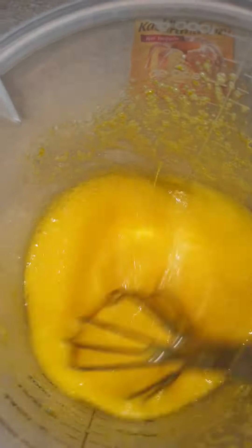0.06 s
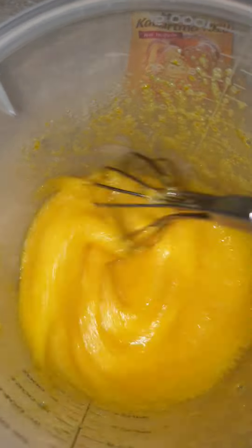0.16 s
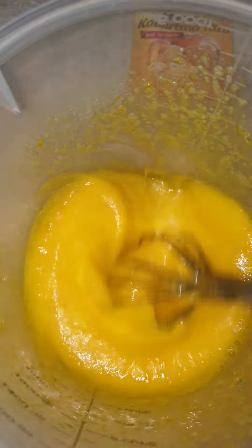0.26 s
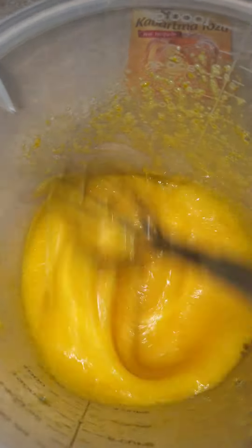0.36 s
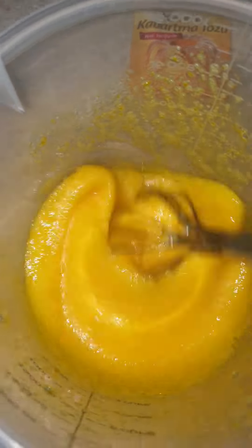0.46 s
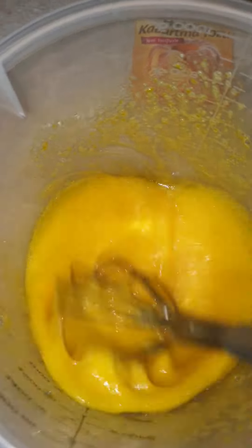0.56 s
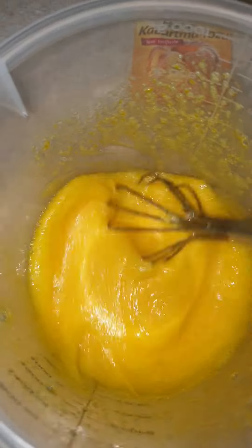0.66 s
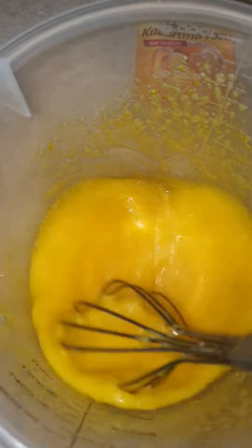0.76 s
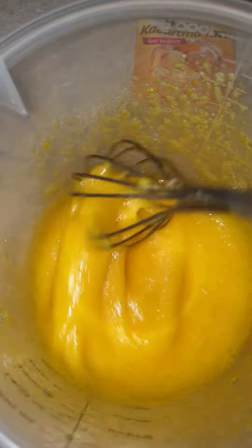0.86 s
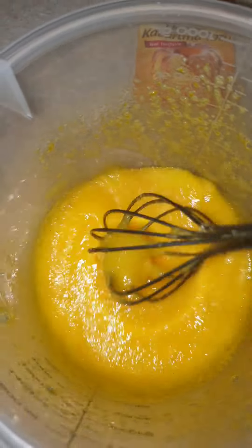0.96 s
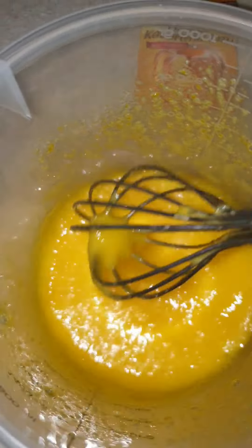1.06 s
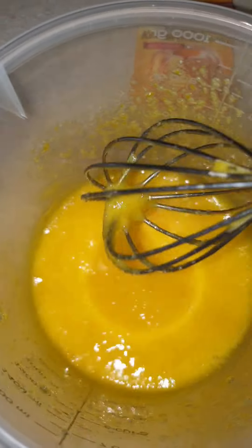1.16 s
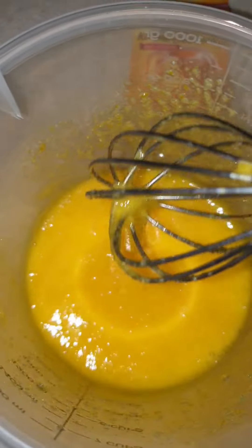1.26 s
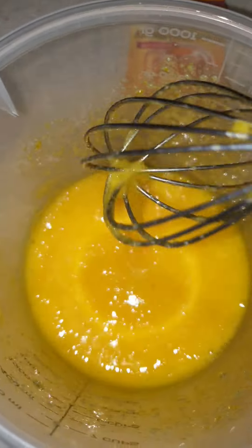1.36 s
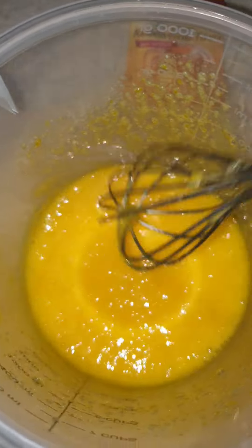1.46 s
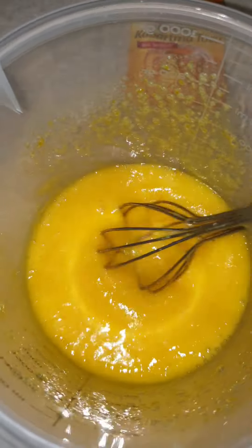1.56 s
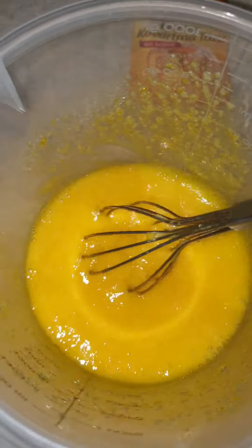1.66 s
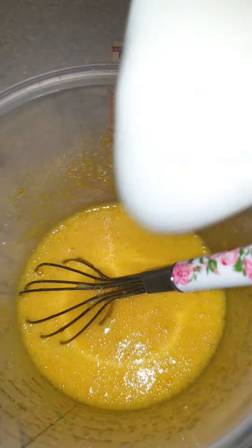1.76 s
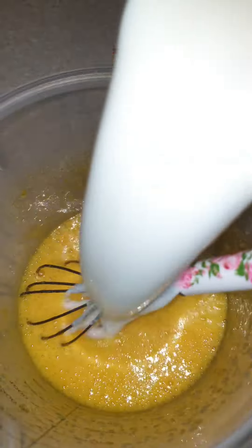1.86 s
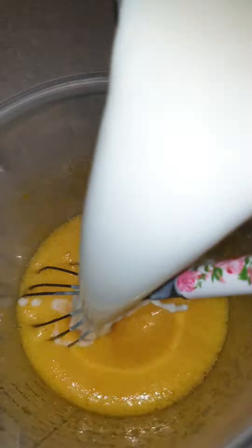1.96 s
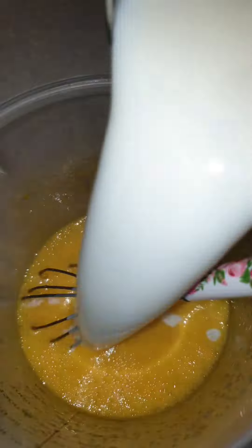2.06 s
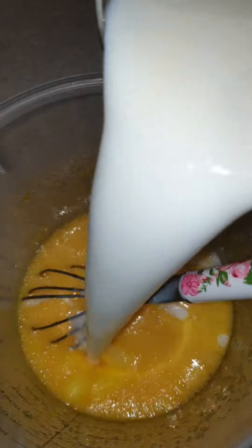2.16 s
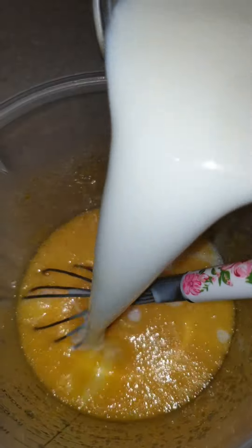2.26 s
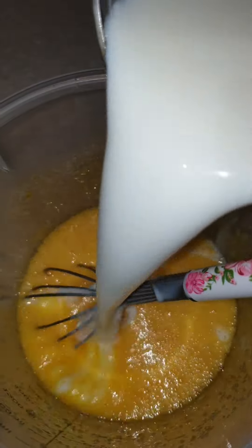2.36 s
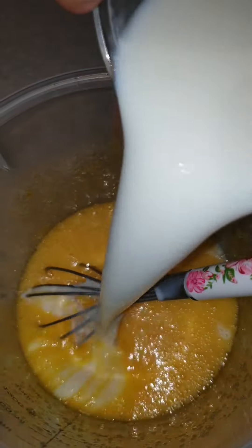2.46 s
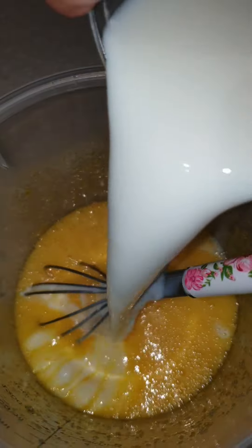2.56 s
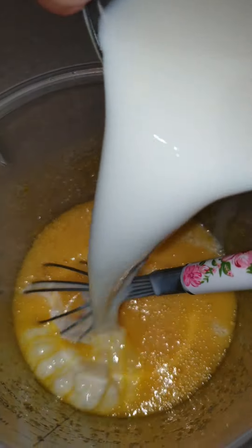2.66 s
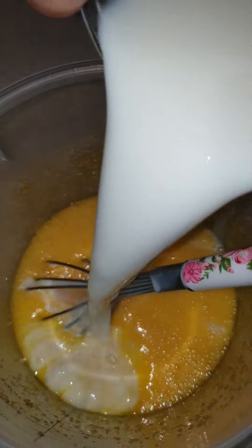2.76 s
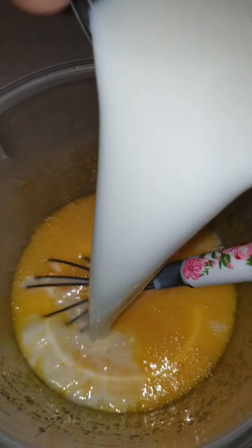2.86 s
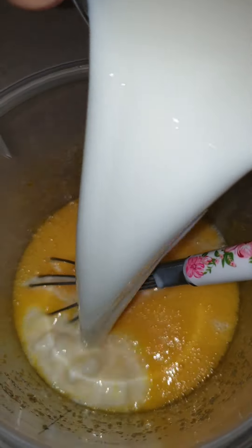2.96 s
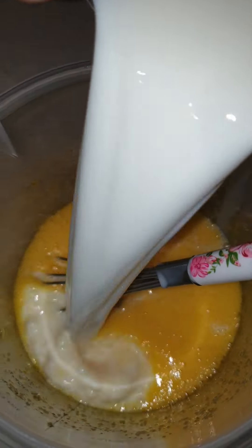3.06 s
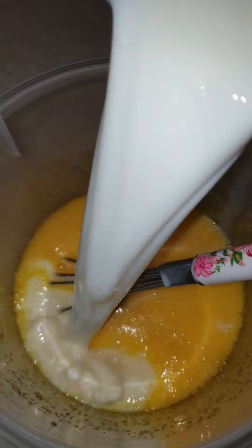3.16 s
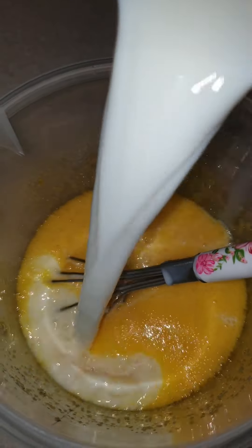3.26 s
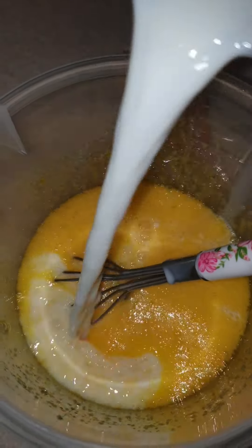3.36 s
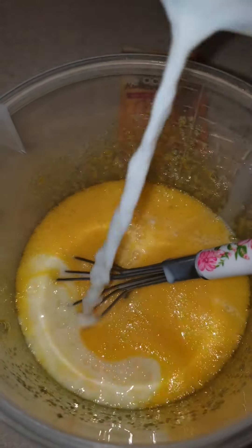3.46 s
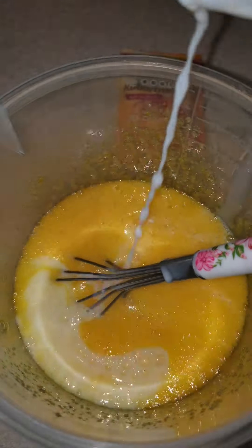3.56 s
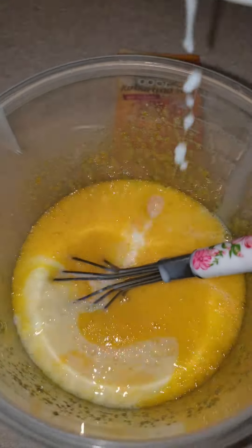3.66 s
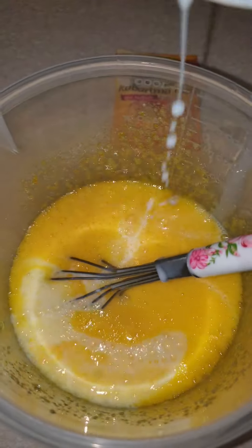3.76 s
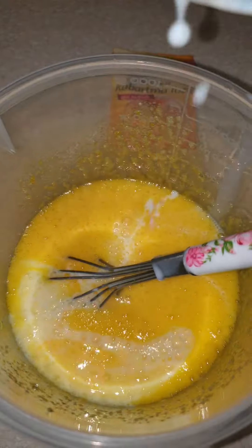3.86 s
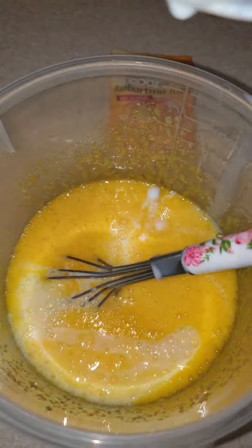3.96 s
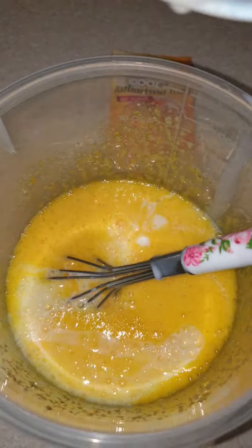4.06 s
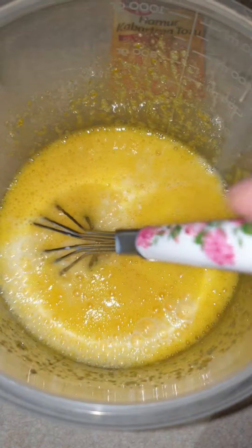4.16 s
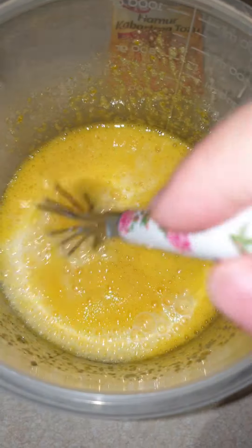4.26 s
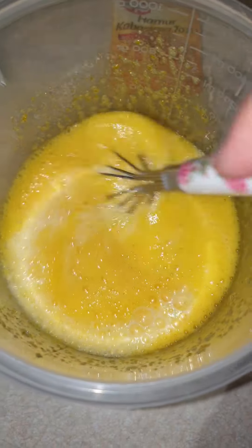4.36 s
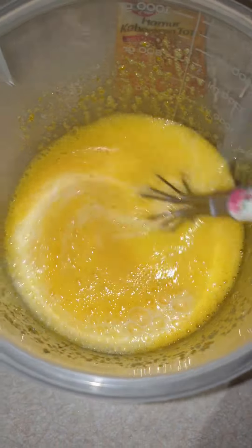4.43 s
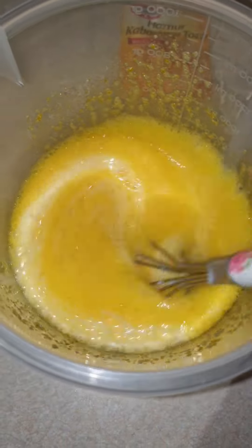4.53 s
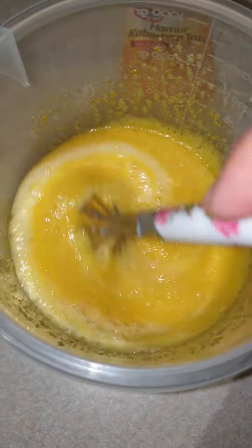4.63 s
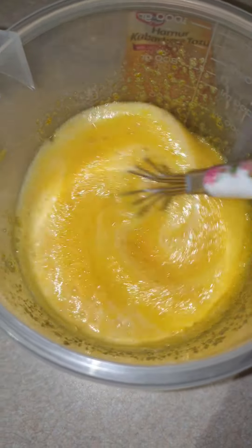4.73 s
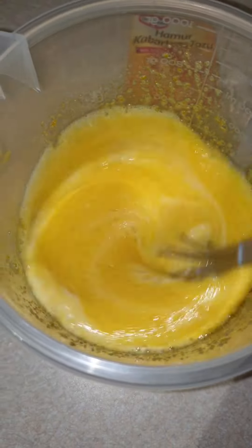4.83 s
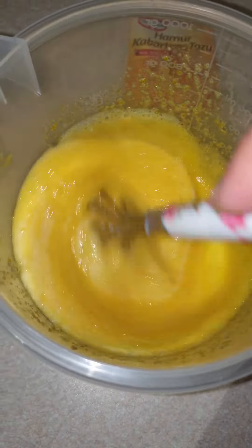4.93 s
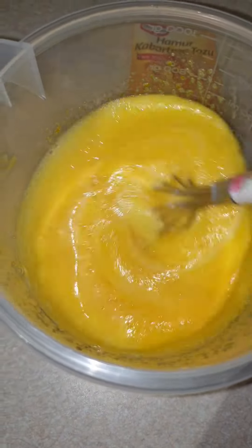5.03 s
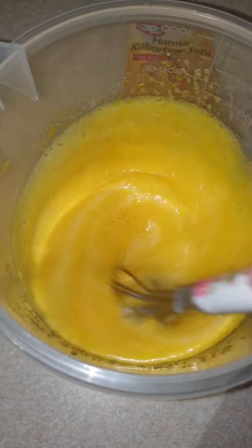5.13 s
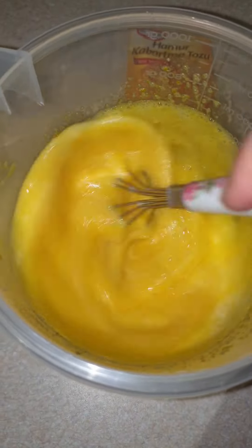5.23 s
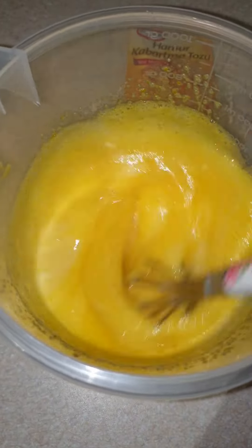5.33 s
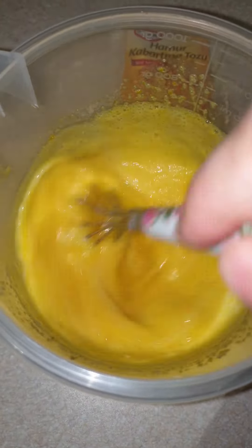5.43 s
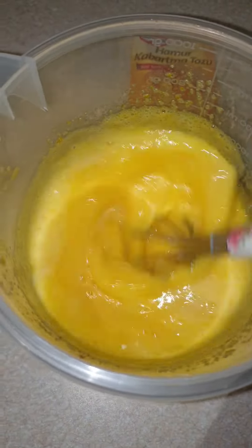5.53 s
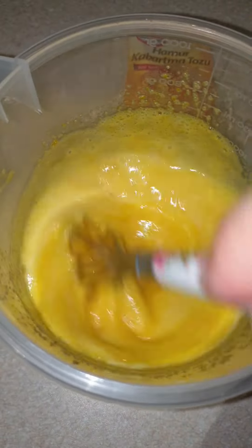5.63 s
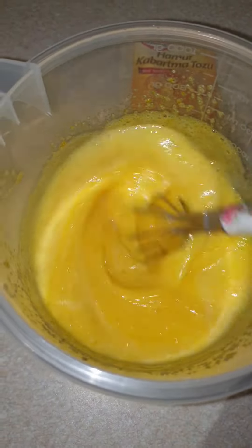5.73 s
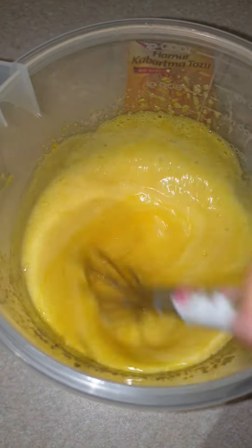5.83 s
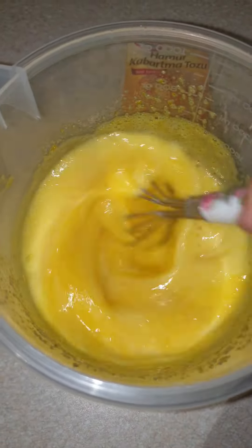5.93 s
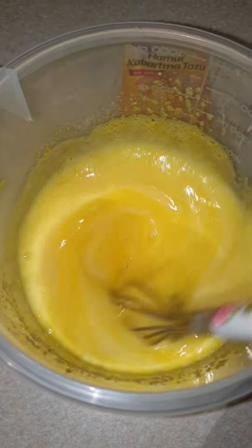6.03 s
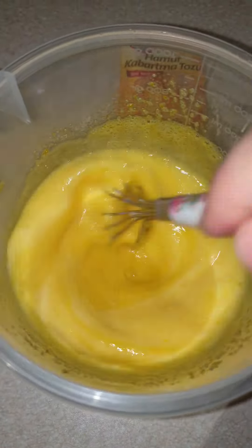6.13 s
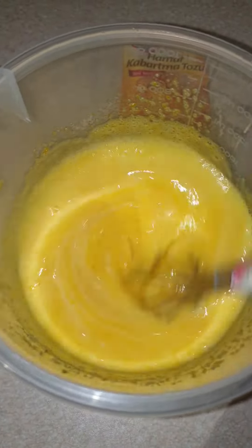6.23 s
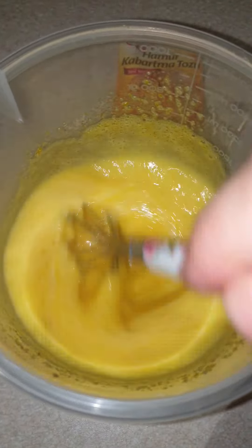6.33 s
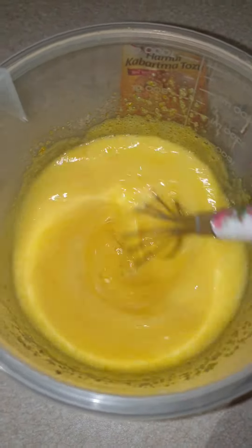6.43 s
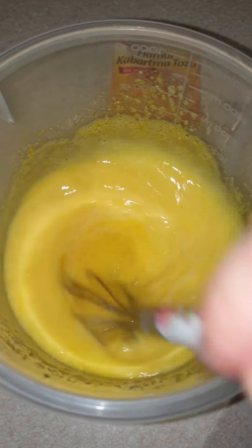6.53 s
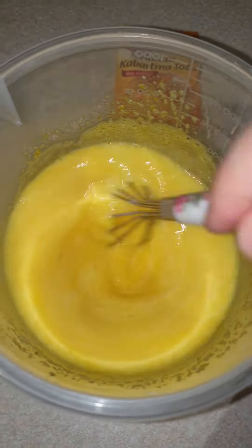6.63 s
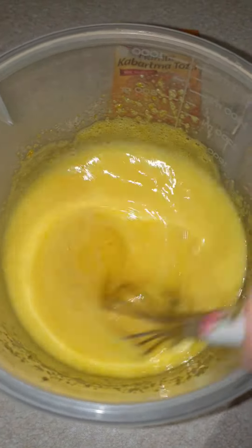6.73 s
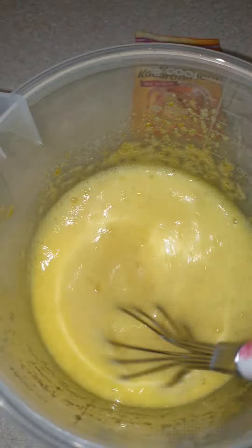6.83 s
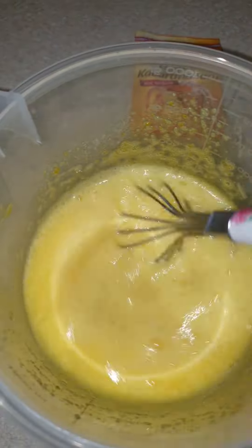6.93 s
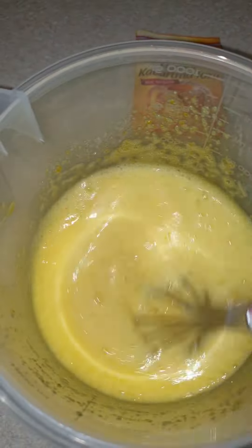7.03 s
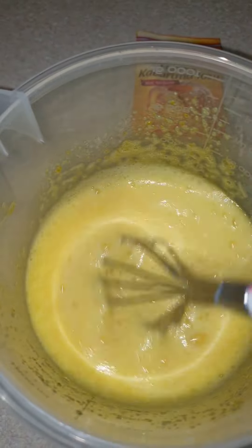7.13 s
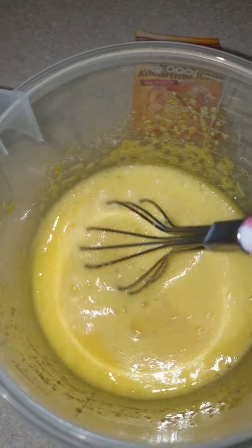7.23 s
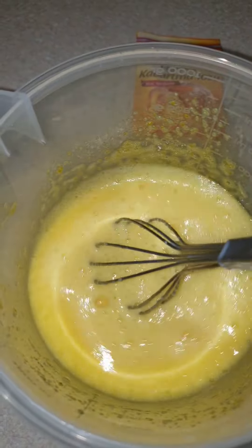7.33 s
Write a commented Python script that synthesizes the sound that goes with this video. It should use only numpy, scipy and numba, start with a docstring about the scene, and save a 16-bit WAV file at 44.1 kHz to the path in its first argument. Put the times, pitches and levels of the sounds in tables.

```python
"""A wire whisk beats egg in a plastic bowl, is laid down, milk is poured in and drips, then it stirs again.
Each stroke is a quick rattle of wires that rings modes of bowl, wall and wires; noise bursts make the liquid
slop and crackle between, and short decaying tones make the air pop. A two-port microphone hangs close above
in a small kitchen with a diffuse tail, faint hiss and a humming counter; the level dips briefly twice."""
import sys
import numpy as np
from scipy import signal
from scipy.fft import rfft, irfft
from scipy.io import wavfile
from scipy.ndimage import uniform_filter1d
from numba import njit

SR = 44100
rng = np.random.default_rng(int(sys.argv[2]) if len(sys.argv) > 2 else 0)


def to_linear_factor(level_db):
    """Convert decibel levels (scalar or array-like) to linear amplitude factors."""
    exponent = np.asarray(level_db, float) / 20
    return 10 ** exponent


def master_out(mix):
    """Clip the mix to full scale and print it as 16-bit PCM to the path in sys.argv[1]."""
    frames = np.transpose(np.atleast_2d(mix))
    ceiling = np.clip(frames, -1, 1)
    pcm = np.round(ceiling * 32767).astype(np.int16)
    wavfile.write(sys.argv[1], SR, pcm)


N = 325899  # samples
TICKS = 26  # wire contacts in each blow

# Milk runs and drips: start in seconds, end in seconds.
POUR = (1.7, 4.3)


def bowl():
    """The blown and stirred bowl: low boom, wall clack, wire tick and the pops of trapped air."""
    # Where the treble comes from. Each row: time in seconds, tilt to the left in dB.
    treble_side = [(1.4, -3), (2.0, -0.5), (3.0, 1), (3.8, 8.5), (4.3, -4), (7.39, -6)]
    late, settle = wire_delays(), settling()
    tilt_db = curve(treble_side)[0]
    treble = clack(late, settle) + tick(late, settle)
    pops = gloops(liquid()[1] * settle)
    return boom(late, settle) + pops + treble * to_linear_factor(np.array([tilt_db, -tilt_db]) / 2 - 2.5)


def blows():
    """Time, clack, boom and tick level of every strike; the wall clacks louder in thick egg, splashes are
    bright."""
    # Wires striking the bowl. Each row: time in seconds, strike in dB, boom over the strike in dB.
    strokes = [(0.0177, -8.5, -11.5), (0.1203, -22.5, -19.5), (0.188, -2.5, -21), (0.23, -3.5, -19),
               (0.4204, -6, -15), (0.4596, -6, -22.5), (0.5792, -30, -12), (0.6529, -6, -15.5),
               (0.6844, -8.5, -16), (0.7724, -20.5, -19), (0.7914, -21.5, -14.5), (0.9209, -23.5, -15.5),
               (1.554, -14.5, -11.5), (1.5701, -16.5, -6), (1.596, -31, -17), (4.184, -45, 3.5),
               (4.341, -28, -1.5), (4.388, -37, -8), (4.42, -46, -3.5), (4.4874, -33, -1.5),
               (4.537, -47, 1.5), (4.579, -39, -2), (4.6234, -45.5, 13), (4.684, -17, -7.5),
               (4.7052, -18, -20), (4.7808, -33.5, -6), (4.8108, -33, -10), (4.874, -31, -14),
               (4.8916, -22, -9.5), (4.9731, -14.5, -4.5), (5.143, -35, 2.5), (5.2118, -20, -1.5),
               (5.235, -21, -18), (5.3019, -20.5, -12.5), (5.363, -23.5, -15), (5.4306, -21.5, 0.5),
               (5.442, -20, -24), (5.4603, -40, 2), (5.5516, -15.5, -28.5), (5.588, -19, -11),
               (5.6727, -22, -3.5), (5.69, -22, -8), (5.762, -28, -10), (5.8202, -17.5, -17),
               (5.896, -12.5, -8), (5.916, -17.5, -11.5), (6.004, -32.5, -1), (6.0457, -22, -9.5),
               (6.058, -33, -29), (6.127, -12.5, -10), (6.1527, -9.5, -16), (6.1762, -26, -3.5),
               (6.2622, -15, -10), (6.279, -22.5, -11), (6.370, -10, -12), (6.382, -16.5, -20),
               (6.3965, -12, -12), (6.488, -22, -23), (6.5117, -9.5, -22), (6.604, -4.5, -12.5),
               (6.72, -23, -4), (6.7343, -6, -21), (6.797, -14.5, -10), (6.8674, -8, -19.5),
               (6.9632, -9, -11.5), (7.003, -10, -8), (7.0577, -27, -8), (7.0923, -12.5, -16.5)]
    # Milk slapping batter and wall. Each row: time in seconds, strike in dB, boom over the strike in dB.
    splashes = [(1.8611, -18, -16), (1.9067, -29, 7), (2.0549, -16.5, -42), (2.127, -20.5, -34),
                (2.2156, -23.5, -24), (2.227, -24, -16), (2.2713, -20, -14), (2.5293, -19.5, -29),
                (2.7169, -20.5, -42), (2.7764, -17.5, -16.5), (2.906, -31.5, -1), (2.9349, -26.5, -7.5),
                (3.2847, -31, -8.5), (3.365, -37.5, -14), (3.386, -31.5, -25), (3.4241, -29, -8),
                (3.4371, -38.5, 13.5), (3.5077, -27, -6), (3.539, -22, -8.5), (3.5654, -26.5, -2),
                (3.5823, -24.5, -19), (3.7595, -37, -4.5), (3.7787, -25.5, -14)]
    # What each part takes of a strike: wall in dB, boom in dB, wires in dB.
    thick_share, thin_share = (-4, 3.9, -9.5), (-8, 3.75, -9.5)
    splash_share = (-15, -2.3, -7)
    rows = [(*row, thick_share if row[0] < POUR[0] else thin_share) for row in strokes]
    rows = sorted(rows + [(*row, splash_share) for row in splashes])
    return np.transpose([(s, db + share[0], db + over_db + share[1], db + share[2])
                         for s, db, over_db, share in rows])


def wire_delays():
    """Seconds by which each wire lands after the first; light touches and splashes are over sooner."""
    s, clack_db, _, tick_db = blows()
    late = 0.0042 * rng.exponential(size=(len(s), TICKS)) * (np.arange(TICKS) > 0)
    late = late * np.clip(1.76 + np.maximum(clack_db, tick_db)[:, None] / 40, 0.3, 1.2)
    pouring = (s > POUR[0]) & (s < POUR[1])
    return late * np.where(pouring, 0.55, 1)[:, None]


def settling():
    """Gain of the moving liquid: whisked batter settles between blows, poured milk runs on, drags swell."""
    # Wires dragged along the wall. Each row: start in seconds, length in seconds, peak boost in dB.
    drags = [(5.01, 0.11, 15), (5.507, 0.062, 20), (5.943, 0.072, 12.5), (6.224, 0.047, 15.5),
             (6.44, 0.086, 11), (6.67, 0.048, 11)]
    s = blows()[0]
    t = np.arange(N) / SR
    since = t - s[np.clip(np.searchsorted(s, t) - 1, 0, None)]
    whisking = (t < POUR[0]) | (t > POUR[1])
    settle = to_linear_factor(-14 * np.clip(since / 0.031, 0, 1) * whisking)
    for start, length, db in drags:
        swell = np.sin(np.pi * np.clip((t - start) / length, 0, 1))
        settle = settle * to_linear_factor(db * np.sqrt(np.abs(swell)))
    return settle


def boom(late, settle):
    """Low modes of bowl and air, rung by blows and slop; the air rings higher as the bowl fills."""
    # What the bowl rings with. Each row: centre in Hz before retuning, width in Hz, level in dB.
    modes = [(436.9, 54, 10.5), (439, 45, 9.5), (676.6, 69, 23), (833, 300, 19.5), (1009, 110, 6.5)]
    # Tuning of the air above the batter. Each row: time in seconds, pitch factor before the slosh.
    fill = [(0, .87), (2.45, .87), (2.75, 1.0)]
    boom_db = blows()[2]
    gain = liquid()[0] * spatter(190, 0.004, 5.5) * settle + after(boom_db - 14, 0.015)
    slop = [gain * grains(1200, 2.2) for _ in range(3)]
    # the sloshing surface keeps retuning the air above it
    pitch = curve(fill)[0] * (1 + 0.045 * walk(30))
    out = body(modes, 0.7 * late, boom_db + 20.5, slop, pitch, alike=0.93, colour_db=2.5, side_db=-4.0,
               edges_hz=(210, 1300), together=True)
    out[1] = np.roll(out[1], 11)  # samples: the boom reaches the right port later
    return out


def clack(late, settle):
    """Middle modes of the wall, rung by blows and by the scrape of moving liquid."""
    # What the wall rings with. Each row: centre in Hz, width in Hz, level in dB.
    modes = [(1860, 1000, 5.7), (2720, 210, -1.5), (3128, 390, 7), (3330, 2600, 12.5)]
    clack_db = blows()[1]
    gain = liquid()[1] * spatter(190, 0.004, 5.5) * settle + after(clack_db - 17.0, 0.011)
    scrape = [gain * grains(3000, 3.7) for _ in range(3)]
    return body(modes, late, clack_db + 17.5, scrape, np.ones(N), alike=0.38, colour_db=3.5, side_db=-4.5,
                edges_hz=(1100, 5200))


def tick(late, settle):
    """High modes, rung by blows and by fine fizz."""
    # What the high treble rings with. Each row: centre in Hz, width in Hz, level in dB.
    modes = [(5500, 370, -3.5), (6006, 680, 0.5), (6710, 590, 3), (10000, 3400, 1), (11360, 820, 4.5),
             (13700, 4100, -9)]
    tick_db = blows()[3]
    gain = liquid()[2] * spatter(80, 0.0042, 2.7) * settle + after(tick_db - 30.5, 0.034)
    fizz = [gain * grains(5000, 0.8) for _ in range(3)]
    return body(modes, late, tick_db + 21.5, fizz, np.ones(N), alike=0.24, colour_db=5.0, side_db=-3.5,
                edges_hz=(4500, 16300))


def body(modes, late, blow_db, flow, pitch, alike, colour_db, side_db, edges_hz, together=False):
    """Blows and flowing liquid ring a set of modes; every blow has its own colour."""
    sway_hz, sway_db = 437.5, 15  # modes below sway_hz are the wall swaying
    s = blows()[0]
    at = np.clip(((s[:, None] + late) * SR).astype(int), 0, N - 1)
    # the rattle swells quickly, then thins out
    shape = np.clip(late / 0.0022, 0.3, 1) * np.exp(-late / 0.0079)
    # each blow shares the same energy out among the modes in its own way
    colour = to_linear_factor(colour_db * rng.standard_normal((len(s), len(modes))))
    weight = to_linear_factor(2 * np.transpose(modes)[2])
    colour = colour / np.sqrt(colour ** 2 @ weight / weight.sum())[:, None]
    out = np.zeros((2, N))
    for k, (hz, width, db) in enumerate(modes):
        # swaying modes retune twice as far and stand out while the bowl holds little
        sway = hz < sway_hz
        centre = hz * pitch ** (1 + sway)
        gain = to_linear_factor(db + sway * sway_db * (np.arange(N) < POUR[0] * SR))
        chance = rng.standard_normal((len(s), 3, TICKS))
        # the wires push a slow mode in step with its swing, so it swells; fast modes each its own way
        size = shape * (np.abs(chance[:, 0]) if together else chance[:, 0])
        total = np.linalg.norm(size, ord=1 if together else 2, axis=1, keepdims=True)
        tone = to_linear_factor(blow_db[:, None]) * colour[:, k, None] / total
        turn = rng.uniform(0, 2 * np.pi, (len(s), 2))
        # moving liquid favours now one mode, now another
        patchy = to_linear_factor(4.0 * walk(35))
        for ch in range(2):
            # the closer alike is to 1, the more the ports share phase and wash
            phase = (1 - alike) * (turn[:, ch, None] + chance[:, 1 + ch])
            phase = phase + together * 2 * np.pi * centre[at] * late
            hit = np.zeros(N, complex)
            np.add.at(hit, at, size * tone * np.exp(1j * phase))
            wash = flow[0] * alike + flow[1 + ch] * np.sqrt(1 - alike ** 2)
            out[ch] += ring(gain * (hit + patchy * wash), centre, 1. * width)
    out = signal.sosfilt(signal.butter(2, edges_hz, "band", fs=SR, output="sos"), out)
    side = to_linear_factor(np.array([[side_db], [-side_db]]) / 2)
    return out * side / np.sqrt(np.sum(weight))


@njit
def ring(x, hz, width):
    """One resonance with a moving centre; the same energy whatever its width."""
    y, z, r = np.empty(len(x)), 0j, np.exp(-np.pi * width / SR)
    p = 0j
    for i in range(len(x)):
        if i % 64 == 0:
            p = r * np.exp(2j * np.pi * hz[i] / SR)
        z = z * p + x[i] + 1e-18
        y[i] = z.imag
    return y * np.sqrt(2 * (1 - r * r))


def liquid():
    """Gains of slop, scrape and fizz as the whisk drags the batter round and milk runs in gushes."""
    # Stirring. Each row: start in seconds, end in seconds, first level in dB, last level in dB.
    stirs = [(0, .7, -38.5, -61.5), (4.36, 6.8, -47.5, -39.5)]
    # Gushes over a thin stream. Each row: start in seconds, end in seconds, first and last level in dB.
    gushes = [(1.72, 1.85, -61.5, -58), (1.9, 2.57, -46.5, -44), (2.6, 2.68, -72.5, -61.5),
              (2.73, 2.93, -43.5, -48), (3.0, 3.4, -58.5, -67), (3.43, 3.6, -56, -57.5)]
    # What moving liquid sounds like: slop in dB, scrape in dB, fizz in dB.
    stir_mix, gush_mix = (0, -0.44, -0.51), (-8, -6.5, 0)
    stir = spans(stirs, rise_db_s=400, fall_db_s=69)
    gush = spans(gushes, rise_db_s=252, fall_db_s=254)
    return [stir * to_linear_factor(a) + gush * to_linear_factor(b) for a, b in zip(stir_mix, gush_mix)]


def gloops(flow):
    """Small pockets of air in moving liquid pop at scattered, rising pitches, from the centre rightwards."""
    count, low_hz, high_hz = 900, 900, 5500
    when, pitch, size, side = rng.random((count, 4)).T
    t = np.arange(800) / SR
    at = (when * (N - len(t))).astype(int)
    hz = (low_hz * (high_hz / low_hz) ** pitch)[:, None]
    pop = plop(t, hz, rise=0.012)
    out = np.zeros((2, N))
    for ch, share in enumerate((side / 2, 1 - side / 2)):
        gain = flow[at] * to_linear_factor(10.5 - 14 * size) * np.sqrt(share)
        np.add.at(out[ch], at[:, None] + np.arange(len(t)), gain[:, None] * pop)
    return out


def plop(t, hz, rise=0.0):
    """A pocket of air rings: the tone swells to its peak after 2.2 nominal cycles and dies away."""
    life = t * hz / 2.2
    return np.sin(2 * np.pi * hz * t * (1 + rise * life)) * life * np.exp(1 - life)


def bubbles():
    """Short plops of escaping air and one rising gurgle, a resonance swept over grainy noise."""
    # Trapped air escaping. Each row: time in seconds, level in dB, pitch in Hz.
    plops = [(1.861, -33, 1760), (1.907, -31.5, 1630), (2.94, -32.5, 775), (4.19, -40.5, 1120),
             (4.346, -37.5, 2050), (4.874, -27, 967), (5.366, -28, 950), (5.533, -28.5, 1110),
             (5.553, -28, 1530), (5.589, -27.5, 910), (5.82, -29, 980)]
    # Air gurgles back: start in seconds, end in seconds, first pitch in Hz, last pitch in Hz, level in dB.
    gurgle = (1.97, 2.08, 1350, 1750, -51)
    out, t = np.zeros(N), np.arange(2000) / SR
    for s, db, hz in plops:
        out[int(s * SR):][:len(t)] += to_linear_factor(db) * plop(t, hz)
    start, end, first_hz, last_hz, db = gurgle
    hz = np.interp(np.arange(N) / SR, (start, end), (first_hz, last_hz))
    air = grains(400, 2.0) * spans([(start, end, db, db)], 800, 800)
    return out + ring(air + 0j, hz, 90.)


def drops():
    """The last drops: each pat is one soft push of air with a dull trickle of low-passed noise."""
    # Soft dull pats. Each row: time in seconds, level in dB.
    pats = [(3.894, -28), (4.033, -26), (4.104, -32)]
    t = np.arange(4000) / SR
    push = (1 - np.exp(-t / 0.00022)) ** 2 * (np.exp(-t / 0.00037) - 0.1 * np.exp(-t / 0.0018))
    trickle = signal.lfilter(*signal.butter(2, 1500., fs=SR), rng.standard_normal(len(t)))
    trickle = trickle * np.sin(np.pi * np.clip(t / 0.059, 0, 1))
    hits = np.zeros(N)
    for s, db in pats:
        hits[int(s * SR)] = to_linear_factor(db)
    return signal.fftconvolve(hits, 4.25 * push + 0.15 * trickle)[:N]


def thud():
    """The handle comes down on the rim and shakes the counter: one push rings two low modes."""
    # The push: time in seconds, level in dB.
    handle = (1.579, -4.5)
    push = np.zeros(N, complex)
    push[int(handle[0] * SR)] = to_linear_factor(handle[1])
    return ring(push, np.full(N, 97.), 23.0) + 2.83 * ring(push, np.full(N, 320.), 103.0)


def curve(table):
    """Columns of a time table, one value a sample."""
    s, *columns = np.transpose(table)
    return [np.interp(np.arange(N) / SR, s, c) for c in columns]


def grains(rate, spread):
    """Dense random specks with a few large ones; rms 1."""
    specks = (rng.random(N) < rate / SR) * rng.standard_normal(N)
    x = specks * to_linear_factor(spread * np.minimum(rng.exponential(size=N), 3))
    return x / np.sqrt(np.mean(x ** 2))


def walk(rate):
    """Random levels held 1 / rate s and slewed; spread near 1."""
    k = int(SR / rate)
    return uniform_filter1d(np.repeat(rng.standard_normal(N // k + 1), k), k // 2)[:N]


def after(blow_db, tail_s):
    """Gain of the motion that goes on for a moment after each blow."""
    kick = np.zeros(N)
    np.add.at(kick, (blows()[0] * SR).astype(int), to_linear_factor(blow_db))
    return signal.lfilter([1], [1, -np.exp(-1 / (tail_s * SR))], kick)


def spatter(rate, tail_s, spread):
    """Gain of splashes that land at random and die quickly; mean power 1."""
    kick = (rng.random(N) < rate / SR) * to_linear_factor(spread * np.minimum(rng.standard_normal(N), 1.5))
    x = 0.4 + signal.lfilter([1], [1, -np.exp(-1 / (tail_s * SR))], kick)
    return x / np.sqrt(np.mean(x ** 2))


def spans(rows, rise_db_s, fall_db_s):
    """Gain of sounds that swell in, go from a first to a last level and die away."""
    t = np.arange(N) / SR
    total = 0
    for start, end, first_db, last_db in rows:
        held_db = np.interp(t, (start, end), (first_db, last_db))
        rise_db = rise_db_s * np.clip(start - t, 0, None)
        fall_db = fall_db_s * np.clip(t - end, 0, None)
        total = total + to_linear_factor(held_db - rise_db - fall_db)
    return total


def kitchen(x, t60_low, t60_high, wet_db):
    """Walls answer with a diffuse tail, different at each port; the treble dies first."""
    t = np.arange(SR // 2) / SR
    noise = rng.standard_normal((2, len(t))) * np.clip(t / 0.00037, 0, 1)
    low = signal.lfilter([0.2], [1, -0.8], noise)
    tail = low * np.exp(-np.log(1000) * t / t60_low) + (noise - low) * np.exp(-np.log(1000) * t / t60_high)
    tail = tail / np.sqrt(np.sum(tail ** 2, axis=1, keepdims=True))
    return x + to_linear_factor(wet_db) * signal.fftconvolve(x, tail, axes=1)[:, :N]


def foam():
    """Thin popping hiss of foam, mostly on the left: high-passed noise in random spatters."""
    # Each row: start in seconds, end in seconds, first level in dB, last level in dB, before the ports.
    foaming = [(3.0, 4.13, -54, -49)]
    high = signal.butter(3, 8200., "high", fs=SR, output="sos")
    pops = signal.sosfilt(high, rng.standard_normal(N))
    return pops * spatter(110, 0.0025, 2.5) * spans(foaming, 25, 700) * np.array([[1.5], [0.3]])


def counter_hum():
    """The counter hums low, more after each blow and when a hand shifts the bowl: noise rings one mode."""
    # The shift. Each row: start in seconds, end in seconds, first level in dB, last level in dB.
    shifts = [(3.78, 4.15, -64, -62)]
    shake = after(blows()[2] - 34, 0.061) + to_linear_factor(-72.5) + spans(shifts, 300, 280)
    middle, apart = rng.standard_normal((2, N)) + 0j
    hum = [ring(shake * (middle + side * 0.35 * apart), np.full(N, 95.), 76.0) for side in (1, -1)]
    return np.array(hum) * np.array([[1.25], [0.95]])


def hiss():
    """A faint hiss, mostly on the right: noise through one broad resonance."""
    # Each row: start in seconds, end in seconds, first level in dB, last level in dB, before the ports.
    hissing = [(0, 1.12, -62, -63), (1.72, 4.2, -67, -85), (4.2, 7.1, -73.5, -58)]
    noise = ring(rng.standard_normal(N) + 0j, np.full(N, 6500.), 1300.0)
    return noise * spans(hissing, 300, 164) * np.array([[0.1], [1.5]])


def room_air():
    """Quiet air of the kitchen: steady noise shaped to a spectrum, unrelated at the two ports."""
    # Spectrum of the air. Each row: frequency in Hz, relative level in dB per Hz.
    spectrum = [(18, -41), (30, -18), (109, -17.5), (780, -21), (8080, -44), (12600, -27.5), (16000, -40.5)]
    hz, db = np.transpose(spectrum)
    gain = to_linear_factor(np.interp(np.log(np.fft.rfftfreq(N, 1 / SR) + 1), np.log(hz), db))
    x = irfft(rfft(rng.standard_normal((2, N))) * gain, N)
    return to_linear_factor(-75) * x / np.sqrt(np.mean(x ** 2))


def scene():
    """Bowl, bubbles, drops and thud in the kitchen, over foam, counter hum, hiss and quiet air."""
    close = bowl() + bubbles() + drops() + thud()
    background = foam() + counter_hum() + hiss() + room_air()
    return kitchen(close, t60_low=0.37, t60_high=0.14, wet_db=-11.0) + background


def band_limit(x):
    """A steep low-pass at the top of the band."""
    return signal.sosfilt(signal.butter(12, 16820, fs=SR, output="sos"), x)


def record(dry):
    """The ports lose the deepest bass, the level dips briefly and peaks beyond full scale are clipped."""
    # Brief dips. Each row: start in seconds, length in ms.
    dips = [(1.7, 12), (6.758, 3.7)]
    t, gain = np.arange(N) / SR, np.ones(N)
    for s, length_ms in dips:
        outside_ms = np.abs(t - s - length_ms / 2000) * 1000 - length_ms / 2
        gain = gain * np.clip(outside_ms, 0.06, 1)
    heard = signal.sosfilt(signal.butter(3, 60., "high", fs=SR, output="sos"), dry)
    return band_limit(np.clip(heard * gain, -1, 1))


dry = scene()
out = record(dry)
master_out(out)
```